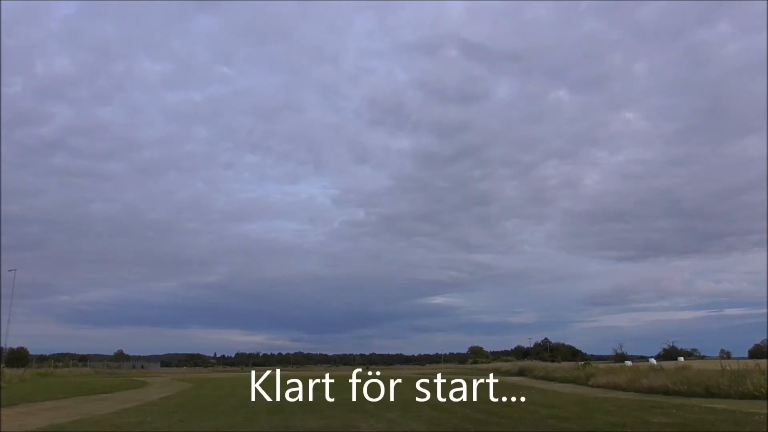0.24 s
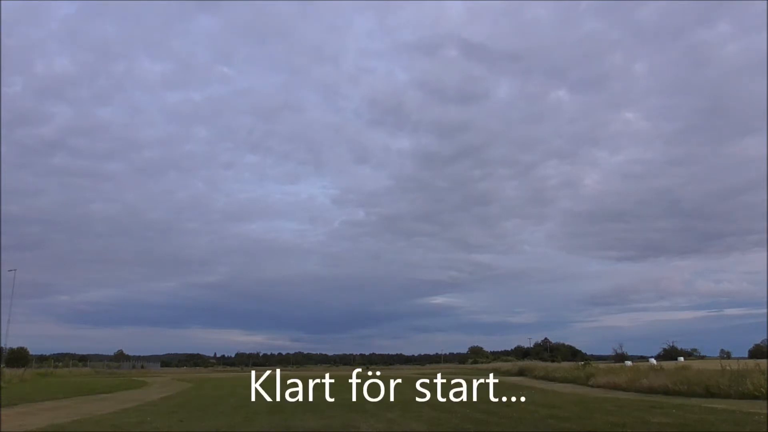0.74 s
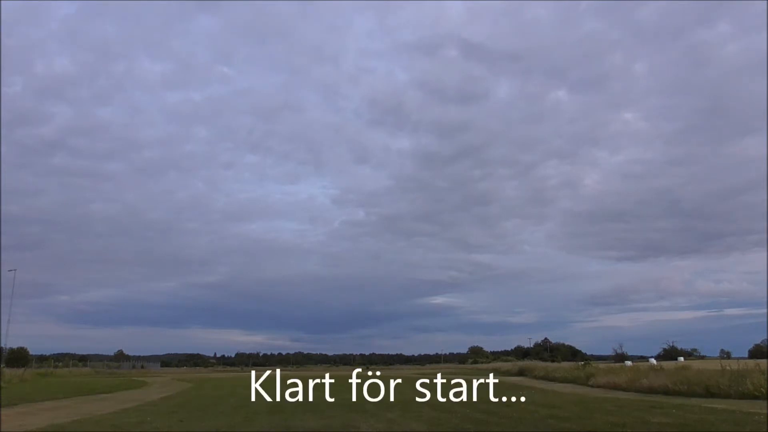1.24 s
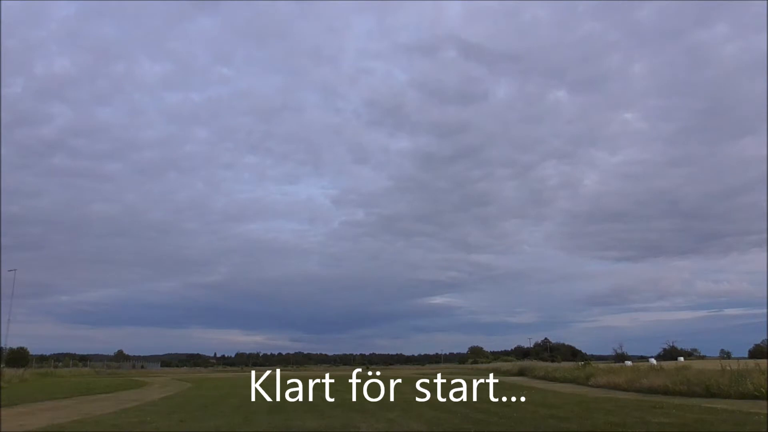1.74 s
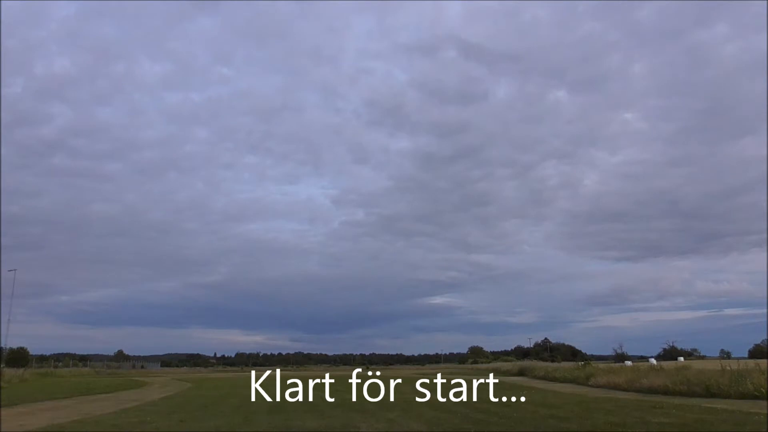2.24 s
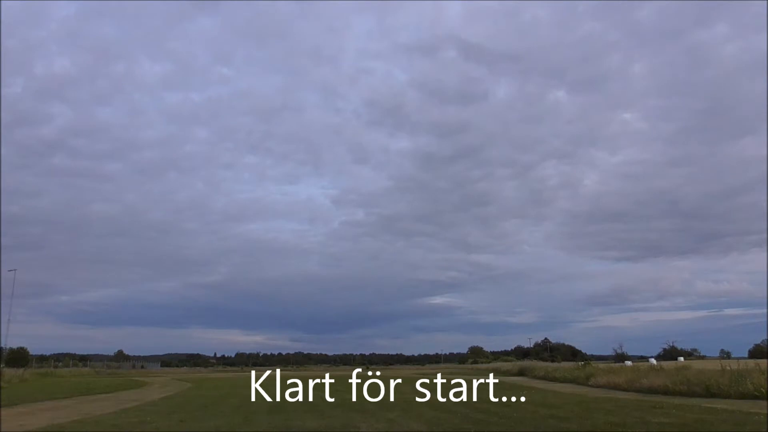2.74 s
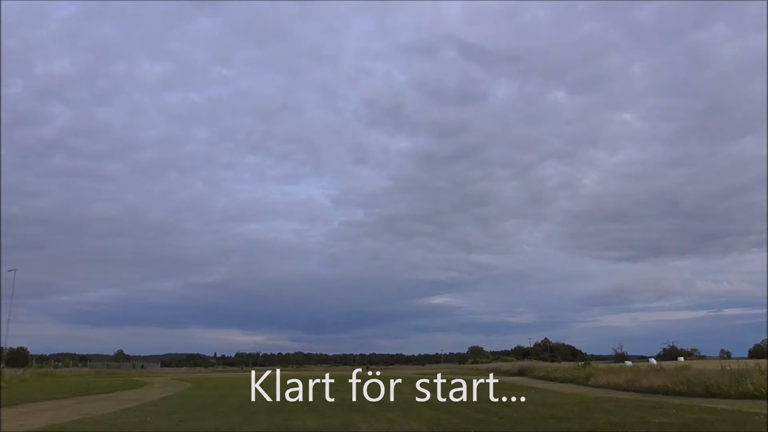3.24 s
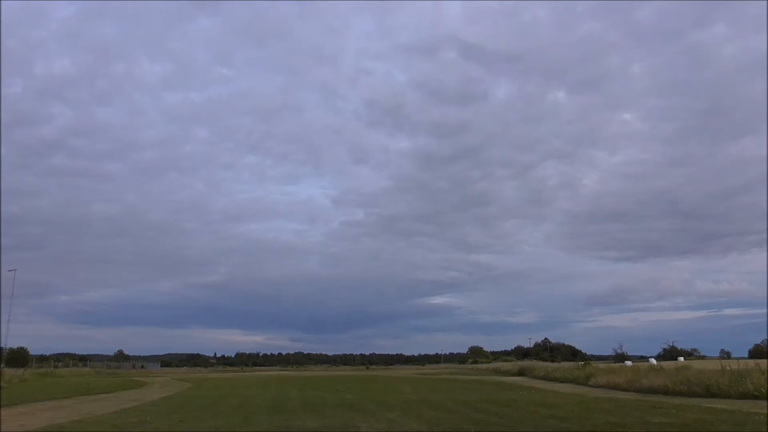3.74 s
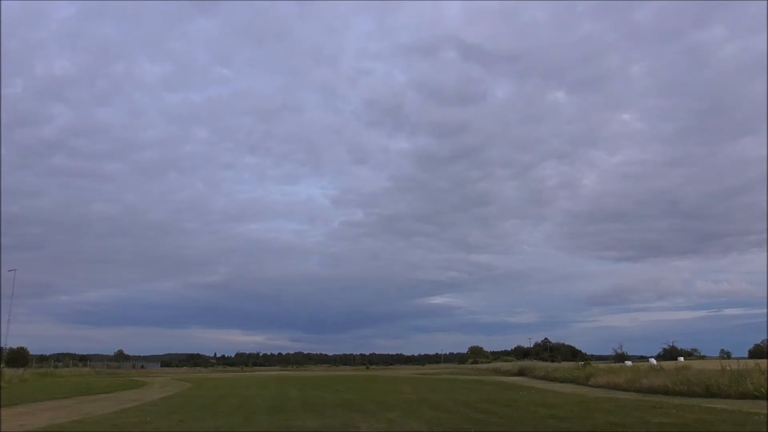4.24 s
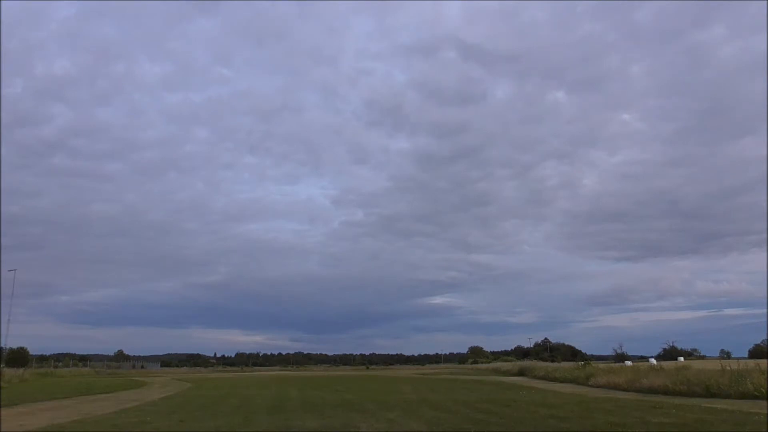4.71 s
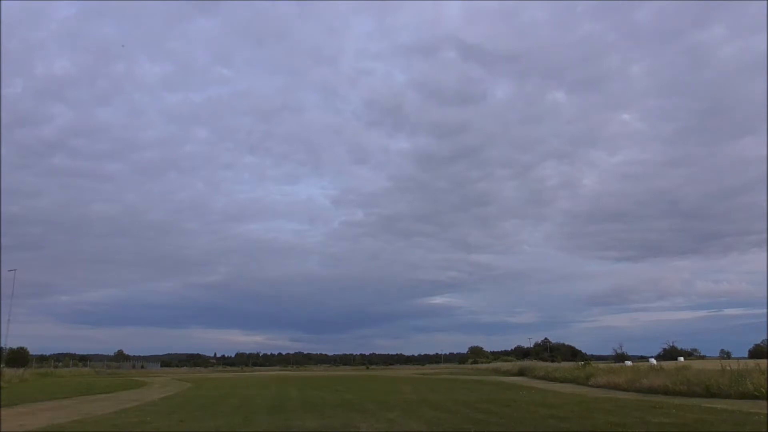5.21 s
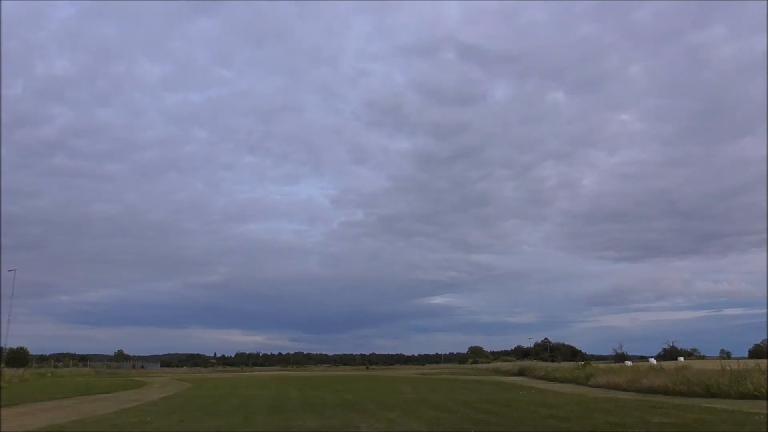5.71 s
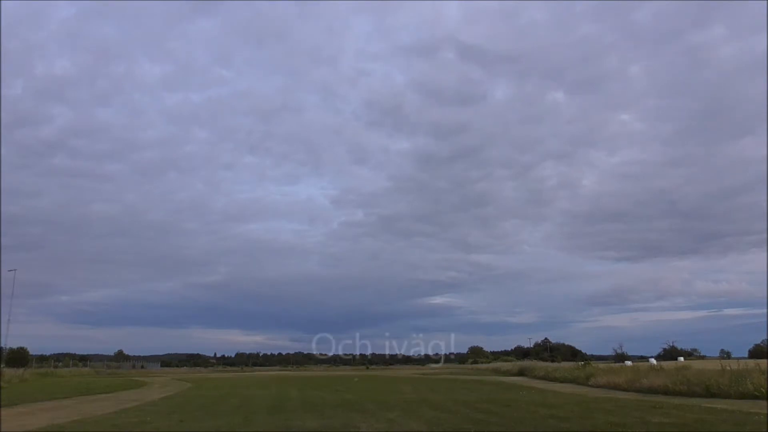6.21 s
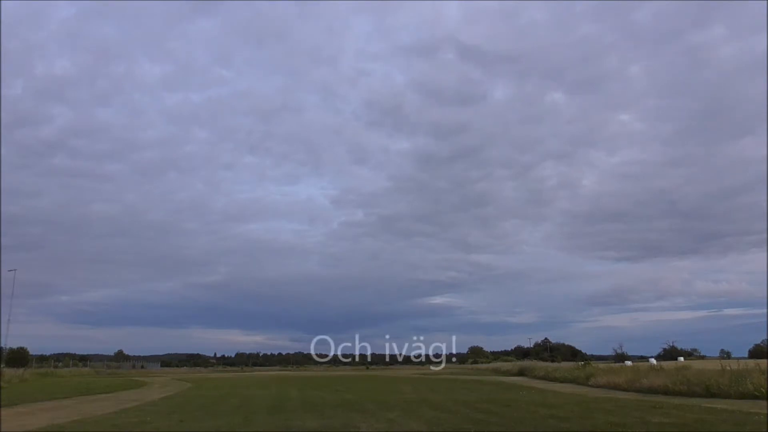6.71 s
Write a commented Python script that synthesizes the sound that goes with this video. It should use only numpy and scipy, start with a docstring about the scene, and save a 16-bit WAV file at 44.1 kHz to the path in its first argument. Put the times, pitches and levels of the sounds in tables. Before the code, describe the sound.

Heard from a microphone on the back of a model jet on a grass field, servos buzz faintly. The electric fan whirrs up briefly and winds down to a stop with a small rattle. It starts again and climbs in steps, its hum and high whine growing much louder amid hissing, roaring air. At the end the rush thickens as the jet begins to roll.

```python
"""Electric model jet at take-off

A camera on the back of a ducted-fan model hears servos buzz, one blip of the motor, then a spool-up in
throttle steps and the start of the roll. Rotating parts radiate at multiples (orders) of the shaft rate:
unbalance hums, blades whistle, the motor whines. The speed controller sings, and turbulence roars,
hisses in the duct and rushes over the airframe, growing as a power of the shaft rate."""
import sys
import numpy as np
from scipy import signal
from scipy.fft import rfft, irfft, next_fast_len
from scipy.io import wavfile
from scipy.ndimage import uniform_filter1d, map_coordinates

SR = 44100
rng = np.random.default_rng(int(sys.argv[2]) if len(sys.argv) > 2 else 0)


def log_audio(samples):
    """Write samples as a 16-bit WAV file to the path given in sys.argv[1]."""
    # one column per channel
    frames = np.atleast_2d(samples).T
    # limit to full scale, then quantise
    limited = np.clip(frames, -1, 1)
    pcm = np.round(limited * 32767).astype(np.int16)
    wavfile.write(sys.argv[1], SR, pcm)


N = 306936

# Noise spectra: f/Hz, relative density/dB
AMBIENT_SPECTRUM = [(25, -28), (55, -3), (110, 1.5), (250, 0), (740, -2), (920, 6), (1150, -11.5),
                    (1500, -7.5), (1900, -16), (6000, -20.5), (13500, -11), (15700, -28)]
SERVO_SPECTRUM = [(3000, -60), (6200, -23), (7000, -1), (8300, -6), (9300, 0.5), (11200, -15), (13200, -27),
                  (15700, -20)]
ROAR_SPECTRUM = [(15, -55), (40, -41), (80, -19.5), (200, -6.5), (330, 2.5), (490, 9), (600, 1.5), (780, 8),
                 (1100, -5), (1450, 3), (1950, -19.5), (3000, -20), (7000, -59)]
HISS_SPECTRUM = [(200, -70), (900, -16), (1400, -7), (1900, -10), (2500, -8.5), (3400, -4), (4600, -1),
                 (5600, -7.5), (7800, -3), (9300, -0.5), (10600, -6), (12500, -5.5), (14500, -10),
                 (15700, -18.5)]
RUSH_SPECTRUM = [(15, -70), (40, -52), (90, -30), (160, -38), (240, -16.5), (380, -13), (540, 0.5),
                 (700, 2.5), (900, 0), (1100, -11), (1400, -6), (1800, -27), (4000, -45)]
FUSELAGE_SPECTRUM = [(600, -38), (800, -4), (900, 2), (1000, -5.5), (1200, -35)]
BEARING_SPECTRUM = [(1400, -35), (2300, 2.5), (2900, -1), (3700, -2), (5000, -24), (7000, -45)]
RATTLE_SPECTRUM = [(150, -35), (400, -6), (600, -2), (850, 7), (1500, -2), (2500, -5), (5000, -27)]

# Shading at the camera's two microphone ports: f/Hz, left minus right/dB
PORT_BALANCE = [(200, -2), (700, 2.5), (1300, 8.5), (2400, 8), (4400, 4), (7000, 6.5), (9200, 0),
                (11000, -16), (13000, -3), (15500, -3)]
# Likeness of turbulence at the ports: f/Hz, coherence (0-1)
PORT_COHERENCE = [(40, 0.96), (120, 0.85), (300, 0.89), (800, 0.83), (1800, 0.72), (5500, 0.48),
                  (7500, 0.69), (9300, 0.94), (10700, 0.18), (15000, 0.75)]
# Delay between the ports: f/Hz, phase lead of the left/rad
PORT_LEAD = [(60, 0), (400, .7), (1100, 1.4), (2500, 1.2), (4600, 1.8), (5600, 2.6), (10000, 3.3),
             (11900, 5.6), (13500, 6.3), (15500, 6.6)]
# Resonances: f/Hz, bandwidth/Hz, gain/dB
PANEL_MODES = [(420, 45, 2), (830, 70, 8), (1235, 75, 9), (1500, 120, -3), (2020, 200, -12),
               (3100, 450, -11), (743, 6, 7)]
DUCT_MODES = [(3985, 130, -3.5), (9500, 660, 7), (12100, 580, 1)]

# The blip and the take-off: start t/s, idle reached t/s, throttle closed t/s, gain/dB
MOTOR_RUNS = [(.87, 1.216, 1.68, -4), (2.786, 3.126, 8, 0)]
# Soft start up to idle: t/s after the start, shaft rate/Hz
IDLE_RAMP = [(0, 0), (.06, 5), (.125, 18), (.185, 40), (.273, 68), (.348, 90)]
# Throttle moves: t/s, target shaft rate/Hz, time constant/s
THROTTLE_MOVES = [(1.223, 310.6, .144), (1.322, 361, .105), (3.132, 257.2, .168), (3.322, 335.1, .1),
                  (3.44, 363.5, .17), (3.762, 409.7, .14), (4.08, 467.9, .09), (4.56, 516, .07),
                  (4.939, 541, .102), (5.17, 586, .068), (5.37, 576, .08), (5.622, 600.5, .028),
                  (5.97, 597, .08), (6.25, 621.6, .041)]
# The blade tone fades and swells near full throttle: t/s, gain/dB
BLADE_GAIN = [(5.22, 0), (5.32, -6), (5.62, -11), (5.7, 6), (5.82, 6), (5.95, -3), (6.15, -4), (6.3, 3.5)]
# Servo twitches and squeaks of the straining airframe: t/s, duration/s, first f/Hz, last f/Hz, level/dB
SERVO_TWITCHES = [(.138, 0.026, 465, 504, -51.5), (.424, .026, 460, 510, -56.5)]
AIRFRAME_SQUEAKS = [(3.81, 0.089, 984, 772, -36.5), (4.32, 0.18, 738, 743, -31.5)]
# The motor jerks as it starts and stops: t/s, relative level/dB
MOTOR_JOLTS = [(0.871, -42.5), (2.046, -37), (2.069, -40), (2.786, -44)]
# Panels ring as motor tones sweep through their resonances, speeding up or braking: t/s, f/Hz, level/dB
PANEL_RINGS = [(1.2135, 860, -27), (1.235, 960, -35), (2.0215, 1230, -29), (2.046, 1240, -29),
               (2.053, 960, -32), (2.077, 880, -37), (3.115, 780, -31), (3.127, 830, -24)]

# Controller carrier, running and (about an octave up) starting: shaft rate/Hz, f/Hz, relative level/dB
RUN_CARRIER = [(90.4, 7795, -44), (200, 7730, -45.5), (333.7, 7680, -46.5), (438.5, 7645, -39),
               (566, 7605, -51), (606, 11000, -71)]
START_CARRIER = [(1, 15720, -68), (35, 15700, -63), (58, 15600, -45), (90, 15550, -59)]
# Their sidebands: offset in shaft orders, relative level/dB
RUN_SIDEBANDS = [(4, -17), (-9, -21), (18, -12)]
START_SIDEBANDS = [(3, -13), (-6, -11), (-4, -6), (-5, -10), (-9, -10), (-13, -7)]

# Line spectra of the rotating parts: shaft order, relative level/dB
UNBALANCE_ORDERS = [(1, -1)]
BLADE_ORDERS = [(5, 0.18)]
WHINE_ORDERS = [(18, 4), (36, -21)]
OVERTONE_ORDERS = [(10, 6), (15, -3.5), (20, -4), (25, -6.5), (27, -22)]  # of blades and motor
UNEVEN_ORDERS = [(4, 4), (6, -10), (7, -10), (9, -8), (10, -6), (11, -7), (12, -4), (13, -7), (14, -10),
                 (15, -7), (23, -10)]  # no two blades or magnets are alike
COGGING_ORDERS = [(5, -5), (6, -8), (9, 0), (10, -6), (12, -17), (15, -19), (18, -1), (27, -9), (36, -18),
                  (54, -22)]
STEP_ORDERS = [(18, -2), (36, 0), (72, -13), (108, -16)]  # magnetic steps of the barely turning rotor

# Tones swell where they meet a resonance of airframe or duct: shaft rate/Hz, relative level/dB
HUM_LEVEL = [(120, -79), (200, -60.5), (292, -30.5), (340, -32.5), (385, -26.5), (428, -33.5), (456, -17.5),
             (485, -14.5), (516, -20), (539, -26), (575, -21), (600, -19.5), (620, -21)]
ORDER_2_LEVEL = [(150, -78), (230, -57), (262, -45), (300, -54), (400, -53), (440, -46), (500, -49),
                 (530, -38), (560, -40), (585, -56)]
ORDER_3_LEVEL = [(150, -78), (270, -51), (340, -53), (400, -57), (435, -42), (480, -42), (520, -52),
                 (545, -47), (580, -64)]
BLADE_LEVEL = [(25, -80), (85, -60), (200, -60), (280, -54), (330, -53), (450, -44), (500, -40), (620, -40)]
WHINE_LEVEL = [(10, -80), (60, -64), (110, -62), (180, -60), (225, -60), (262, -50.5), (290, -56),
               (325, -54), (345, -56), (354, -45), (385, -42), (400, -49), (430, -39), (500, -40),
               (545, -38), (580, -50), (600, -50), (621, -42)]
ORDER_27_LEVEL = [(40, -85), (65, -65), (100, -65), (150, -58), (180, -70), (245, -64), (268, -52),
                  (295, -61), (325, -51), (350, -68)]
# Strength of torque ripple, magnetic steps and bearing rasp: shaft rate/Hz, relative level/dB
RIPPLE_LEVEL = [(3, -66), (10, -58), (25, -52), (43, -47.5), (68, -47.5), (80, -48), (88, -53), (104, -53),
                (135, -46.5), (175, -51), (230, -52), (300, -55), (450, -85)]
STEPPING_LEVEL = [(5, -72), (11, -49.5), (23, -52.5), (42, -56.5), (60, -66), (90, -85)]
BEARING_LEVEL = [(60, -92.5), (170, -66.5), (260, -61), (340, -57.5), (480, -43.5), (580, -37.5),
                 (620, -59)]

BAND_LIMIT_HZ = 15780
FULL_SHAFT_HZ = 600
COAST_S = .331  # from closing the throttle to braking


def amp(db):
    """Amplitude ratio of a level in decibels."""
    return 10 ** (np.asarray(db) / 20)


def unit(x):
    """Normalisation to rms 1."""
    return x / np.sqrt(np.mean(x ** 2) + 1e-20)


def along(points, hz):
    """Interpolation of (f/Hz, value) points on a logarithmic frequency axis."""
    f, v = np.transpose(points)
    return np.interp(np.log(hz + 1), np.log(f + 1), v)


def at_speed(rows, speed):
    """Linear interpolation of each column at the shaft rate."""
    rates, *columns = np.transpose(rows)
    return [np.interp(speed, rates, column) for column in columns]


def since(s):
    """Time elapsed since a moment, 0 before it."""
    return np.maximum(np.arange(N) / SR - s, 0)


def during(start, end):
    """Rectangular gate with soft edges."""
    return uniform_filter1d(1. * ((since(start) > 0) & (since(end) == 0)), size=200)


def wobble(rate):
    """Smooth random modulation, with rate knots a second."""
    return map_coordinates(rng.standard_normal(int(N * rate / SR) + 4), [np.arange(N) * rate / SR])


def phase(hz):
    """Phase as the time integral of frequency."""
    return 2 * np.pi * np.cumsum(hz) / SR


def filtered(x, response):
    """Linear filtering: the spectrum is multiplied by a frequency response."""
    size = next_fast_len(N + SR // 2)
    return irfft(rfft(x, size) * response(np.fft.rfftfreq(size, 1 / SR)), size)[..., :N]


def noise(spectrum):
    """Spectral shaping of two independent white noises, to rms 1."""
    return unit(filtered(rng.standard_normal((2, N)), lambda hz: amp(along(spectrum, hz))))


def resonate(x, modes):
    """Modal superposition: second-order resonators add with alternating sign."""
    def response(f):
        return sum((-1) ** k * amp(db) * 1j * f * width / (centre ** 2 - f * f + 1j * f * width)
                   for k, (centre, width, db) in enumerate(modes))
    return filtered(x, response)


def orders(speed, table, flutter_db, jitter_rad, carrier=0):
    """Lines at carrier + order x shaft rate, broadened by random amplitude and phase modulation."""
    out = np.zeros(N)
    for order, db in table:
        hz = carrier + order * speed
        level = amp(db + flutter_db * (wobble(12) + wobble(70)) / 2) * (hz < BAND_LIMIT_HZ)
        out += np.sqrt(2) * level * np.sin(phase(hz) + jitter_rad * wobble(150))
    return out


def ports(sound):
    """Diffraction: the camera body shades and delays the sound differently at each port."""
    def response(hz):
        shade = amp(np.outer([.5, -.5], along(PORT_BALANCE, hz)))
        delay = np.exp(1j * np.outer([.5, -.5], along(PORT_LEAD, hz)))
        return shade / np.sqrt(np.mean(shade ** 2, axis=0)) * delay
    return filtered(sound, response)


def spread(pair):
    """Partial coherence: the ports receive the sum and difference of two independent noises."""
    def weights(hz):
        mix_angle = np.arccos(np.clip(along(PORT_COHERENCE, hz), 0, 1)) / 2
        return np.array([np.cos(mix_angle), np.sin(mix_angle)])
    common, apart = filtered(pair, weights)
    return np.array([common + apart, common - apart])


def shaft_speed():
    """Inertia: the shaft rate (Hz) lags each throttle move, falls evenly when coasting, then brakes."""
    coast_hz_per_s, brake_s, stick_hz = 570, .044, 12  # friction stops the last stick_hz outright
    total = np.zeros(N)
    for start, _, closed, _ in MOTOR_RUNS:
        speed = np.interp(since(start), *np.transpose(IDLE_RAMP))
        previous = IDLE_RAMP[-1][1]
        for s, target, lag in THROTTLE_MOVES:
            if start < s < closed:
                speed += (target - previous) * (1 - np.exp(-since(s) / lag))
                previous = target
        coasted = speed - coast_hz_per_s * np.minimum(since(closed), COAST_S)
        brake = np.exp(-since(closed + COAST_S) / brake_s)
        total += np.maximum((coasted + stick_hz) * brake - stick_hz, 0)
    return np.abs(uniform_filter1d(total, size=600))


def drive():
    """Motor states (0-1) and run gain; the current decays exponentially once the throttle closes."""
    starting, powered, coasting, gain_db = np.zeros((4, N))
    for start, idle, closed, db in MOTOR_RUNS:
        current = np.exp(-since(closed) / .03)
        starting += during(start, idle)
        powered += during(idle, closed + COAST_S) * current
        coasting += during(closed, closed + COAST_S) * (1 - current)
        gain_db += db * (since(start) > 0) * (since(closed + 2 * COAST_S) == 0)
    return starting, powered, coasting, amp(gain_db)


def ambience():
    """Stationary noise forms a faint background."""
    return amp(-60) * noise(AMBIENT_SPECTRUM)


def servo_buzz(frame_hz=50):
    """Amplitude modulation: the servos emit bursts of noise at their frame rate."""
    bursts = np.clip(.7 + 1.5 * np.cos(2 * np.pi * frame_hz * (np.arange(N) / SR - .015)), 0, 1)
    common, apart = noise(SERVO_SPECTRUM)
    return amp(-68) * unit(bursts * np.array([common + .74 * apart, common - .44 * apart]))


def chirps(table):
    """Frequency glides: each twitch or squeak is a short swept tone that swells and fades."""
    out = np.zeros(N)
    for s, duration, from_hz, to_hz, db in table:
        n = round(duration * SR)
        tone = np.sin(phase(np.linspace(from_hz, to_hz, n)) + .52 * wobble(167)[:n])
        out[round(s * SR):][:n] += np.sqrt(2) * amp(db) * signal.windows.tukey(n, .6) * tone
    return out


def bearings(speed):
    """Cyclostationary noise: the bearings rasp once in every turn."""
    once_a_turn = unit((1 + np.cos(phase(speed))) ** 2)
    level = amp(along(BEARING_LEVEL, speed) + 1.5 * wobble(40))
    return level * once_a_turn * spread(noise(BEARING_SPECTRUM))


def panel_rings(rise_s=.0015, t60_s=.055):
    """Damped vibration: at each listed time a panel rings briefly as a motor tone crosses its resonance."""
    t = np.arange(SR // 10) / SR
    out = np.zeros(N)
    for s, hz, db in PANEL_RINGS:
        envelope = amp(db - 60 * t / t60_s) * (1 - np.exp(-t / rise_s))
        out[round(s * SR):][:len(t)] += envelope * np.sin(2 * np.pi * hz * t)
    return out


def controller(speed, starting, powered):
    """Modulation: commutation puts sidebands on the switching tone, which fades at full throttle."""
    hz, db = at_speed(RUN_CARRIER, speed)
    sidebands = orders(speed, RUN_SIDEBANDS, flutter_db=3, jitter_rad=.4, carrier=hz)
    sidebands *= np.exp(1 - speed / 130)  # strongest at low speed
    tone = orders(speed, [(0, 9)], flutter_db=1.5, jitter_rad=.1, carrier=hz)
    octave = amp(-16) * np.sin(phase(2 * hz))
    start_hz, start_db = at_speed(START_CARRIER, speed)
    soft_start = orders(speed, START_SIDEBANDS, flutter_db=3, jitter_rad=.83, carrier=start_hz)
    return powered * amp(db) * (tone + sidebands + octave) + starting * amp(start_db) * soft_start


def cogging(speed, gain, whirr):
    """Forced vibration: uneven torque drives the panel modes until inertia smooths it at high speed."""
    braking = sum(during(closed + COAST_S, closed + 2 * COAST_S) for _, _, closed, _ in MOTOR_RUNS)
    ripple = amp(along(RIPPLE_LEVEL, speed) + 1.5 * braking)  # braking current strengthens it
    jerky = speed * (1 + .164 * wobble(45) * np.exp(-speed / 16))  # the slow rotor stutters
    torque = whirr * ripple * orders(jerky, COGGING_ORDERS, flutter_db=3, jitter_rad=.45)
    step_level = gain * amp(along(STEPPING_LEVEL, speed))
    steps = step_level * orders(jerky, STEP_ORDERS, flutter_db=2.5, jitter_rad=.4)
    t = np.arange(SR // 20) / SR
    jolts = np.zeros(N)
    for s, db in MOTOR_JOLTS:
        jolts[round(s * SR):][:len(t)] += amp(db - 60 * t / .02)
    # jolts and ripple both rattle the motor in its loose mount
    rattle = (amp(-7.5) * jolts + amp(-8.5) * ripple) * noise(RATTLE_SPECTRUM)[0]
    thud = amp(-3) * jolts * noise(ROAR_SPECTRUM)[0]
    direct = amp(-25) * torque
    return resonate(torque + steps + rattle, PANEL_MODES) + direct + thud


def airflow(speed, powered, gain, rolling):
    """Power laws of turbulent noise: each level in dB is linear in the logarithm of the shaft rate."""
    decades = np.log10(speed / FULL_SHAFT_HZ + 1e-6)
    grind = amp(-55) * np.clip(speed / 12, 0, 1)  # noise of the slowly turning motor
    switching_hiss = amp(-55.5) * powered
    roar_level = np.hypot(amp(-29.5 + 40.5 * decades - 9 * rolling), grind)
    hiss_level = gain * np.hypot(amp(-28 + 58.5 * decades), switching_hiss) + amp(-15) * grind
    roar = roar_level * amp(.87 * wobble(30)) * noise(ROAR_SPECTRUM)
    hiss = hiss_level * amp(.96 * wobble(30)) * noise(HISS_SPECTRUM)
    # the blades chop eddies into a hump of noise just under the blade tone
    eddies = noise([(20, -4.5), (250, -.5), (500, -4), (800, -11), (1300, -60)])
    chop = amp(-34 + 38 * decades) * eddies * np.sin(phase(4.6 * speed))
    buffet_db = 1.1 * wobble(35)
    rush = amp(-32.5 + 64 * decades + 5.5 * rolling + buffet_db) * noise(RUSH_SPECTRUM)
    # the hollow fuselage drones as the wheels run
    drone = amp(-32.5 + buffet_db) * rolling * noise(FUSELAGE_SPECTRUM)
    lean = amp([[-1.7], [1.7]])  # the slipstream strikes the right port harder
    return spread(roar + hiss + chop) + lean * spread(rush + drone)


def hum(speed, gain, rolling):
    """Rotating unbalance shakes the airframe once a turn, with second and third harmonics."""
    ground_db = rolling * (-4.5 + wobble(40))  # weaker on the roll, and shaken by bumps
    level = gain * amp(along(HUM_LEVEL, speed) + ground_db)
    out = level * orders(speed, UNBALANCE_ORDERS, flutter_db=1.24, jitter_rad=.031)
    for order, curve in ((2, ORDER_2_LEVEL), (3, ORDER_3_LEVEL)):
        out += amp(along(curve, speed)) * orders(speed, [(order, 0)], flutter_db=2.5, jitter_rad=.2)
    return out


def blade_tone(speed):
    """Blade passage: five blades give five pressure pulses a turn."""
    swell_db = np.interp(since(0), *np.transpose(BLADE_GAIN))
    level = amp(along(BLADE_LEVEL, speed) + swell_db)
    return level * orders(speed, BLADE_ORDERS, flutter_db=2.5, jitter_rad=.25)


def motor_whine(speed):
    """Commutation excites the motor 18 times a turn; orders 27 and 36 sound with it."""
    jitter = .2 + .5 * np.clip(1 - speed / FULL_SHAFT_HZ, 0, 1)  # rougher at part throttle
    main = orders(speed, WHINE_ORDERS, flutter_db=3, jitter_rad=jitter)
    upper = orders(speed, [(27, 0)], flutter_db=3, jitter_rad=jitter)
    return amp(along(WHINE_LEVEL, speed)) * main + amp(along(ORDER_27_LEVEL, speed)) * upper


def fan(speed, coasting, gain, rolling, whirr):
    """Shaft orders superpose; the overtones stand out where they cross a duct resonance."""
    unloaded_db = -13 * coasting
    tones = hum(speed, gain, rolling) + blade_tone(speed)
    whine = gain * whirr * amp(unloaded_db) * motor_whine(speed)
    overtone_level = amp(-36) * (speed / FULL_SHAFT_HZ) ** 2.6
    overtones = overtone_level * orders(speed, OVERTONE_ORDERS, flutter_db=4.5, jitter_rad=.45)
    uneven_level = amp(-57 + unloaded_db / 2) * np.minimum(speed / 320, 1) ** 2
    uneven = uneven_level * orders(speed, UNEVEN_ORDERS, flutter_db=5, jitter_rad=1.1)
    turning = np.clip(speed / 40, 0, 1) ** 2
    return turning * (tones + whine + uneven + resonate(overtones + uneven / 2, DUCT_MODES))


def scene():
    """Superposition: the sources on board add at the two ports, over the background."""
    speed = shaft_speed()
    starting, powered, coasting, gain = drive()
    release_s, transition_s = 6.06, .15  # the jet is let go and rolls
    rolling = np.minimum(since(release_s - transition_s / 2) / transition_s, 1)
    # the unloaded rotor wanders in its bearings and breaks up its tones
    whirr = amp(3 * coasting * (wobble(45) - 1.5))
    on_board = fan(speed, coasting, gain, rolling, whirr) + cogging(speed, gain, whirr) + panel_rings()
    on_board += controller(speed, starting, gain * powered)
    on_board = on_board + bearings(speed) + chirps(SERVO_TWITCHES) + chirps(AIRFRAME_SQUEAKS)
    on_board += airflow(speed, powered, gain, rolling)
    return ports(on_board) + servo_buzz() + ambience()


def record(dry):
    """Ideal low-pass filter: the camera keeps nothing above its band limit."""
    return filtered(dry, lambda hz: hz < BAND_LIMIT_HZ)


dry = scene()
out = record(dry)
log_audio(out)
```